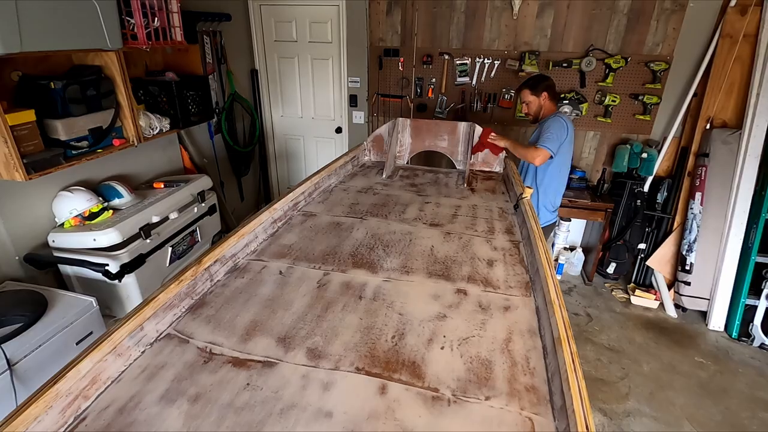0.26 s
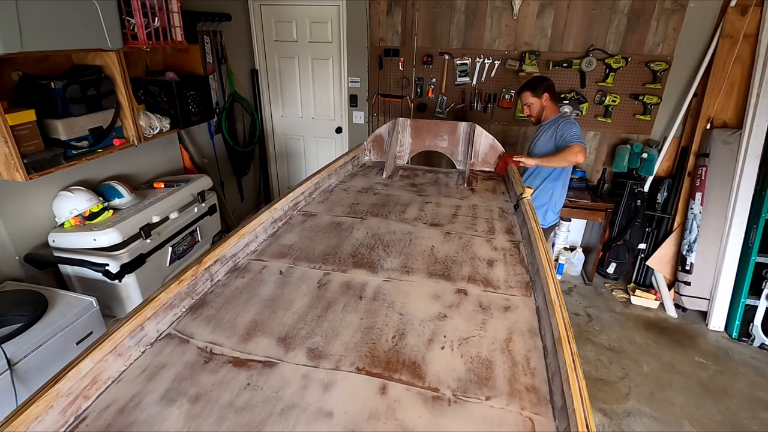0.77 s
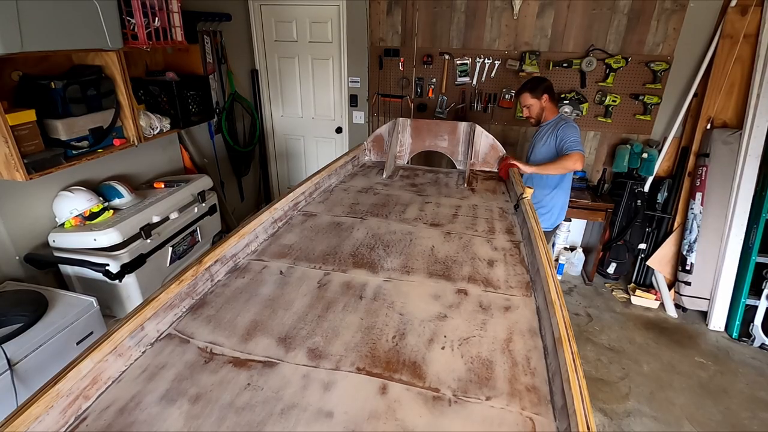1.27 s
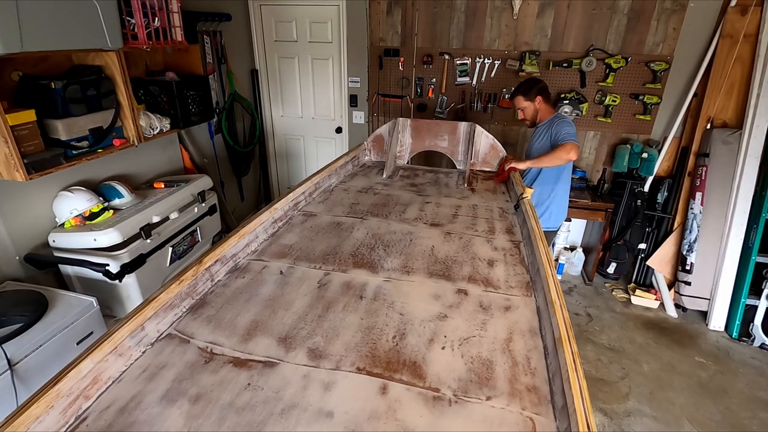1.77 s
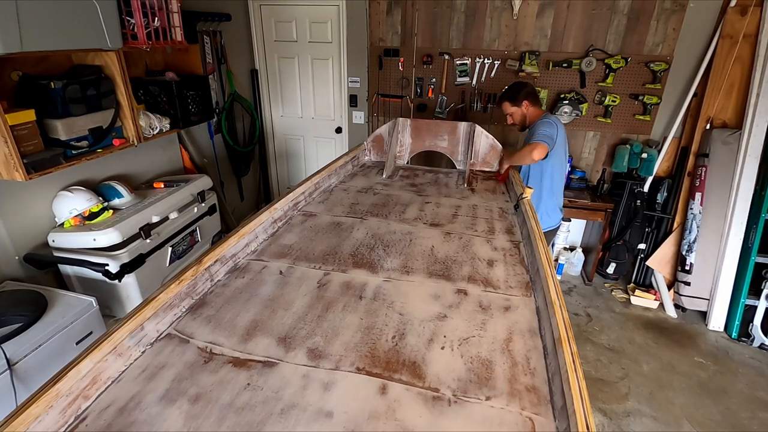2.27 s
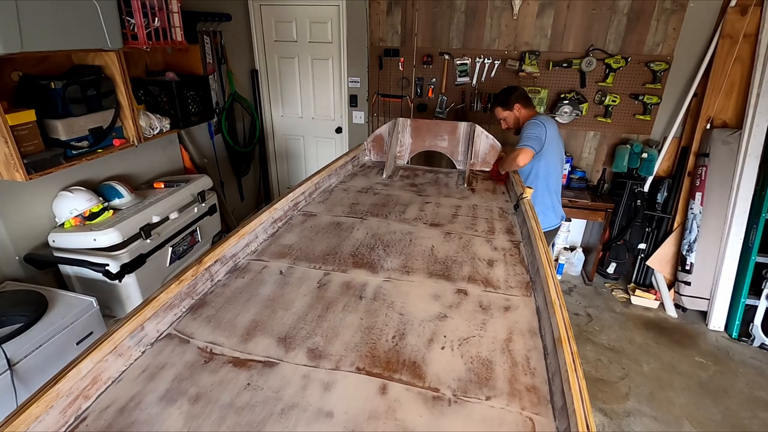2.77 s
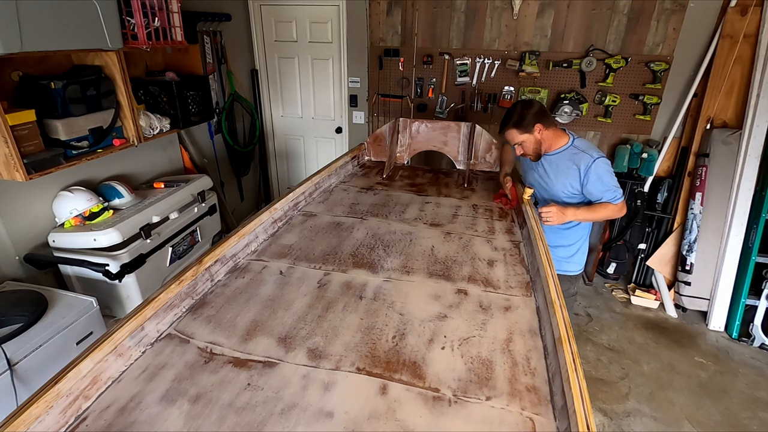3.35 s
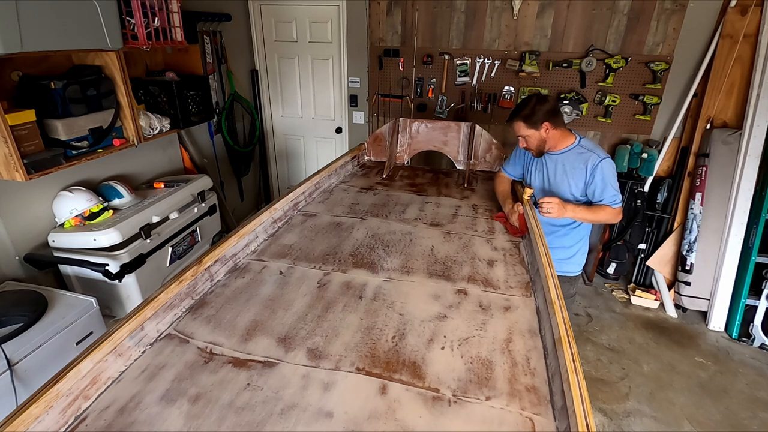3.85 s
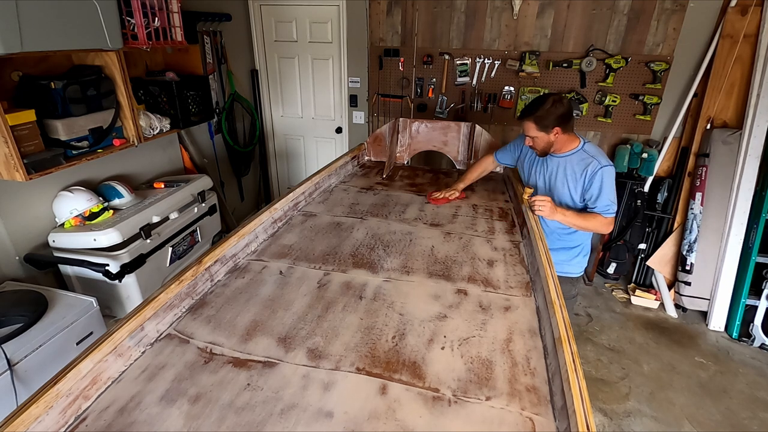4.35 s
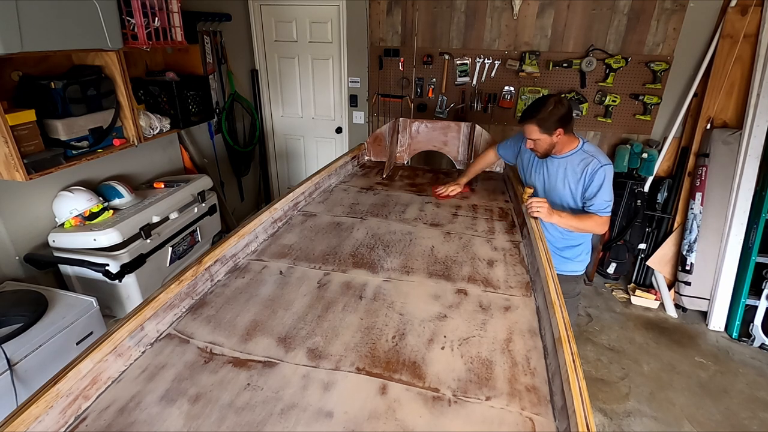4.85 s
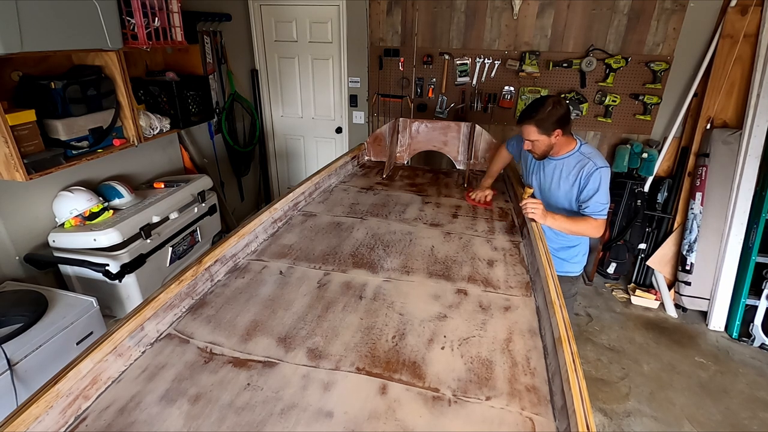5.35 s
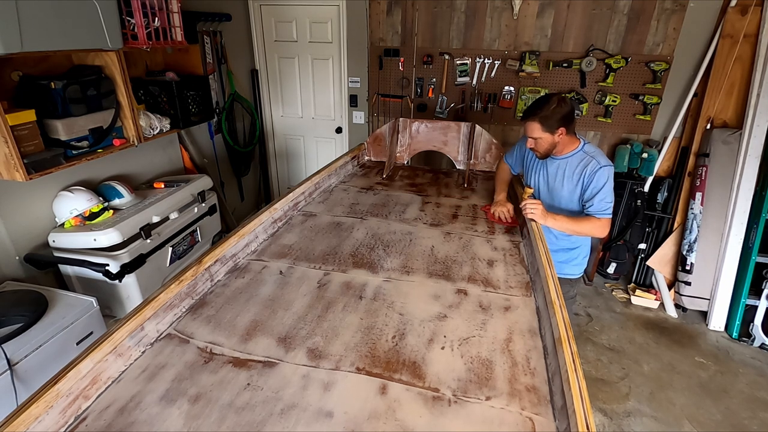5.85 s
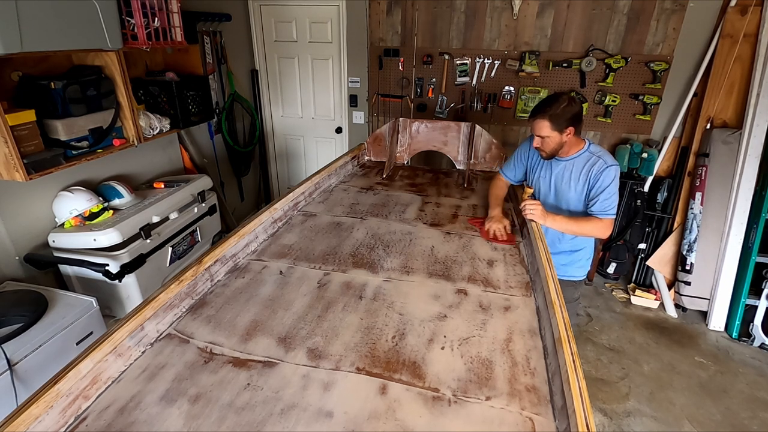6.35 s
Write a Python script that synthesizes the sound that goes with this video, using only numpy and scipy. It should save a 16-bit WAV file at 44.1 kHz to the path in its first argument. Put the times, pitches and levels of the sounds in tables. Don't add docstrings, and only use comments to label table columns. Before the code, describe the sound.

Close dry cloth scrubbing on a wooden hull in a garage, uneven strokes becoming steady circular swishes as a deep motor hum cuts to faint fan throb.

```python
import sys
import numpy as np
from scipy import signal
from scipy.fft import rfft, irfft, next_fast_len
from scipy.io import wavfile
from scipy.ndimage import uniform_filter1d, map_coordinates

SR = 44100
rng = np.random.default_rng(int(sys.argv[2]) if len(sys.argv) > 2 else 0)


def wrap_up_sound(samples):
    columns = np.atleast_2d(samples).T
    tamed = np.clip(columns, -1, 1)
    steps = np.round(tamed * 32767).astype(np.int16)
    wavfile.write(sys.argv[1], SR, steps)


def gain_from_db(level_db):
    decades = np.asarray(level_db, float) / 20
    return 10 ** decades


N = 291942
T = np.arange(N) / SR
CHANGE_S, LAST_CHANGE_S = 3.0531, 6.51
CIRCLES_FROM_S = 3.9


def unit(x):
    return x / np.sqrt(np.mean(x ** 2) + 1e-20)


def along(points, hz):
    f, v = np.transpose(points)
    return np.interp(np.log(hz + 1), np.log(f + 1), v)


def curves(rows):
    s, *cols = np.transpose(rows)
    return [np.interp(T, s, c) for c in cols]


def swells(rows, shape=2):
    return sum(db * np.exp(-np.abs((T - s) / half) ** shape) for s, db, half in rows)


def wobble(rate):
    coarse = T[::64]
    knots = rng.standard_normal(int(N * rate / SR) + 4)
    return np.interp(T, coarse, map_coordinates(knots, [coarse * rate]))


def filtered(x, response):
    m = next_fast_len(N + SR // 2)
    return irfft(rfft(x, m) * response(np.fft.rfftfreq(m, 1 / SR)), m)[:N]


def coloured(x, spectrum):
    return unit(filtered(x, lambda hz: gain_from_db(along(spectrum, hz))))


def resonant(x, modes):
    def body(f):
        total = 0
        for k, (centre, width, db) in enumerate(modes):
            damping = 1j * f * width
            total = total + (-1) ** k * gain_from_db(db) * damping / (centre ** 2 - f ** 2 + damping)
        return total
    return unit(filtered(x, body))


def soft(x):
    return filtered(x, lambda hz: 1 / (1 + (hz / 7000) ** 2))


def slips(spread_db, patchy_db, favoured=None, lift=0, width_hz=600):
    grains = rng.standard_normal(N + 512) * gain_from_db(spread_db * rng.standard_normal(N + 512))
    hz, t, z = signal.stft(grains, SR, nperseg=1024)
    field = uniform_filter1d(rng.standard_normal(z.shape), size=14, axis=0)
    field = uniform_filter1d(field, size=7, axis=1)
    z = z * gain_from_db(patchy_db * unit(field))
    if favoured:
        centre_hz = np.interp(t, *np.transpose(favoured), left=-1e5, right=-1e5)
        z = z * (1 + lift / (1 + ((hz[:, None] - centre_hz) / width_hz) ** 2))
    return signal.istft(z, nperseg=1024)[1][:N]


def fibre_hiss(sweep_db, stop_db):
    # f/Hz, level/dB per Hz
    hiss = [(1500, -17), (3200, -6.5), (5000, -2.5), (7000, -1.5), (9500, -0.5), (10800, -9), (13000, -49)]
    circle_s, top_s = 0.583, 4.07
    t = np.arange(CIRCLES_FROM_S, T[-1], 0.03)
    pocket_hz = 5400 + 550 * np.cos(2 * np.pi * (t - top_s) / circle_s)
    grains = slips(spread_db=2.5, patchy_db=0.8, favoured=list(zip(t, pocket_hz)), lift=0.46, width_hz=1200)
    return gain_from_db(sweep_db - stop_db) * coloured(grains, hiss)


def sheen(stroke_db, sweep_db, stop_db):
    # f/Hz, level/dB per Hz
    treble = [(8000, -17), (10500, -2), (12500, -1.5), (14500, -0.5), (15800, -1.5), (16500, -60)]
    level_db = -3.5 + 0.5 * sweep_db - 1.4 * stop_db
    level_db = level_db + 2.5 * (T > LAST_CHANGE_S)
    on_rail_db = -1.5 - 0.15 * (stroke_db + 55.5)
    level_db = level_db + (T < CIRCLES_FROM_S) * on_rail_db
    return gain_from_db(level_db) * coloured(slips(spread_db=3.0, patchy_db=0.4), treble)


def rail(drag_db, stop_db):
    # f/Hz, width/Hz, level/dB
    strip = [(1378, 700, -1.5), (2050, 980, 3), (2880, 910, 3), (4140, 2500, -3)]
    # middle t/s, gain/dB, half length/s
    catches = [(0.27, 5, .03), (0.42, 2, 0.075), (1.465, 7.5, 0.013), (2.2, 7, .02), (2.3, 5, .03),
               (2.68, 4.5, 0.054), (3.26, 3, .04), (3.62, 3.5, 0.044)]
    level_db = drag_db - 0.41 * stop_db + swells(catches) - 1.5
    return gain_from_db(level_db) * resonant(soft(slips(spread_db=4.5, patchy_db=0.97)), strip)


def panel(stop_db):
    # f/Hz, width/Hz, level/dB
    ply = [(305, 140, -2.5), (540, 126, 1), (912, 324, -0.5), (1072, 253, 1.5), (1540, 275, -5.5)]
    # middle t/s, gain/dB, half length/s, nearest panel tone f/Hz
    presses = [(0.014, 9, 0.064, 890), (0.12, 4.5, 0.05, 418), (0.28, 3.5, 0.037, 800),
               (0.354, 13, 0.066, 564), (0.482, 12.5, 0.057, 540), (0.99, 10, .03, 600),
               (1.187, 14, 0.033, 574), (1.35, -4, 0.062, 700), (1.55, 10.5, 0.038, 523),
               (1.657, 3, .05, 800), (1.797, 4, .05, 765), (2, 6.5, 0.062, 795), (2.13, 4, .04, 564),
               (2.246, 14.5, 0.037, 900), (2.305, 5.5, .04, 800), (2.39, 11, .04, 500),
               (2.62, 7.5, 0.092, 710), (2.75, 7, 0.058, 520), (2.96, 7.5, 0.091, 790),
               (3.283, 3, 0.11, 885), (3.65, 2.5, 0.087, 920), (4.086, 4.5, 0.11, 590),
               (4.61, 6.5, .025, 590), (4.74, 3, 0.019, 590), (5.35, 3, 0.058, 584), (5.984, 1, 0.044, 600),
               (6.269, 9, 0.015, 595)]
    far_db = -7.5 * np.clip((T - CHANGE_S) / 0.5, 0, 1)
    level_db = swells([row[:3] for row in presses]) - 6.5 + far_db - 0.28 * stop_db
    place = [(s, hz) for s, _, _, hz in presses]
    grains = slips(spread_db=3.0, patchy_db=1.0, favoured=place, lift=1.1, width_hz=140)
    return gain_from_db(level_db) * resonant(soft(grains), ply)


def rag():
    # t/s, stroke level/dB, drag into the rail/dB
    effort = [(0.0, -53.5, -2), (0.1, -52.5, -3.5), (0.28, -51.5, -4.5), (0.55, -58.5, -2.5),
              (0.75, -60.5, 0.5), (1.3, -61, -1.5), (1.46, -57.5, -1), (1.8, -56.5, -5.5), (2.1, -55, -4.5),
              (2.3, -53.5, -3.5), (2.62, -53, -3.5), (3.0, -49.5, -3), (3.3, -47.5, -3.5), (3.6, -47, -4.5),
              (3.85, -53, -3), (4.04, -53.5, -4.5), (4.15, -48.5, -6.5), (6.62, -49, -6)]
    # middle t/s, loss/dB, half length/s
    turns = [(0.165, 12, 0.037), (0.835, 10, 0.043), (0.91, 6.5, .045), (1.095, 16, 0.07),
             (1.352, 10, 0.038), (1.61, 14, 0.058), (1.881, 10.5, 0.037), (2.15, 10.5, 0.052),
             (2.479, 12, 0.039), (2.744, 14.5, 0.081), (3.078, 13, .025), (3.407, 9.5, 0.037),
             (3.786, 8.5, 0.035)]
    # middle t/s, gain/dB
    sweeps = [(4.26, -1.5), (4.46, 1.5), (4.72, 1.5), (4.89, 3.5), (5.02, 3), (5.13, 3), (5.26, 2),
              (5.36, 2), (5.59, 3.5), (5.74, 2), (5.97, 1), (6.19, 4), (6.37, 2), (6.6, 3)]
    stroke_db, drag_db = curves(effort)
    stop_db = swells(turns, shape=2.7)
    sweep_db = swells([(s, db, 0.055) for s, db in sweeps])
    cloth = fibre_hiss(sweep_db, stop_db) + sheen(stroke_db, sweep_db, stop_db)
    wood = rail(drag_db, stop_db) + panel(stop_db)
    tremble = gain_from_db(0.38 * wobble(14))
    return tremble * gain_from_db(stroke_db) * (cloth + wood)


def garage(x):
    # f/Hz, t60/s
    decay = [(200, 1), (2000, 0.26), (10000, 0.054)]
    hz, t, z = signal.stft(rng.standard_normal(SR // 2), SR, nperseg=256)
    fading = gain_from_db(-60 * t / along(decay, hz)[:, None])
    tail = signal.istft(z * fading, SR, nperseg=256)[1]
    return signal.fftconvolve(x, tail / np.linalg.norm(tail))[:N]


def machine(hz, orders, zero, unsteady_db, slant):
    total = 0
    for k, db in orders:
        level = gain_from_db(db + 3 + unsteady_db * wobble(5))
        total = total + level * np.sin(2 * np.pi * k * hz * (T - zero) + slant * (k * k - 1))
    return total


def compressor():
    # multiple of the shaft speed, level/dB rms
    overtones = [(2, -54.5), (3, -67.5), (4, -62.5), (8, -70), (16, -72.5)]
    shaft_hz = 29.98
    zero_s = -0.0042 + 0.0034 * np.clip((0.68 - T) / 0.16, 0, 1)
    firm = machine(shaft_hz, [(1, -27)], zero_s, unsteady_db=-0.2, slant=0)
    return firm + machine(shaft_hz, overtones, zero_s, unsteady_db=2.5, slant=0.9)


def car():
    # t/s, f/Hz, level/dB rms
    engine = [
        (0, 109, -51),
        (1.0, 113, -59),
        (1.8, 122.8, -52),
        (2.4, 132.6, -54),
        (3.05, 135.5, -71),
    ]
    hz, db = curves(engine)
    return gain_from_db(db - 5 + 5.9 * wobble(5.96)) * np.sin(2 * np.pi * np.cumsum(hz) / SR)


def rumbles():
    # f/Hz, level/dB per Hz
    early = [(3, -16), (6, 8.5), (9, 14), (14, -35), (42, 2), (56, -3), (66, -16.5), (75, -12), (110, -15),
             (140, -25.5), (300, -50.5)]
    # f/Hz, level/dB per Hz
    late = [(3, -5.5), (10, 6), (22, -11), (37, 1), (46, -24), (59, -13.5), (74, -28), (100, -10),
            (140, -24.5), (300, -43)]
    before = gain_from_db(-40.5) * coloured(rng.standard_normal(N), early)
    return before, gain_from_db(-44.5) * coloured(rng.standard_normal(N), late)


def room_air():
    # f/Hz, level/dB per Hz
    tone = [(90, -3.5), (160, -1.5), (210, 0.5), (300, -1), (520, -4), (750, -9), (1200, -7), (2300, -13),
            (3000, -23), (8000, -27), (15800, -64)]
    return gain_from_db(-56.5 + 0.58 * wobble(4.16)) * coloured(slips(spread_db=0.4, patchy_db=1.1), tone)


def bumps():
    # t/s, peak level/dB, f/Hz, t60/s
    contacts = [(0.28, -51, 306, 0.059), (0.37, -53, 227, 0.072), (0.66, -33, 55, 0.27),
                (0.53, -40, 56, .9), (0.64, -43, 62, 0.18), (1.001, -48, 280, 0.055),
                (1.02, -49, 476, 0.048), (1.17, -53.5, 550, 0.12), (1.198, -53, 325, 0.12),
                (1.4, -49, 430, 0.059), (1.79, -49.5, 184, 0.067), (2.649, -47, 271, 0.11),
                (2.4, -56, 374, 0.066), (3.2, -60, 1450, 0.09), (0.083, -54.5, 184, 0.12),
                (2.67, -42, 106, 0.22), (2.661, -50, 170, 0.14), (.66, -52, 180, 0.125),
                (3.06, -44, 100, 0.27)]
    out, t = np.zeros(N + SR), np.arange(SR) / SR
    rough = gain_from_db(2.7 * wobble(60))
    for s, db, hz, t60 in contacts:
        envelope = gain_from_db(db + 10 - 60 * t / t60) * (1 - np.exp(-t / 0.0054))
        out[round(s * SR):][:SR] += envelope * np.sin(2 * np.pi * hz * t)
    return out[:N] * rough


def door():
    # middle t/s, peak level/dB, f/Hz, half length/s, falling zero t/s
    swings = [
        (0.744, -11, 9.02, 0.086, .712),
        (1.208, -24, 9, 0.13, 1.165),
    ]
    total = 0
    for s, db, hz, half, zero in swings:
        envelope = gain_from_db(db) * np.exp(-np.abs((T - s) / half) ** 2.6 / 2)
        total = total - envelope * np.sin(2 * np.pi * hz * (T - zero))
    return total


def fan():
    # multiple of the shaft speed, level/dB rms
    throb = [(2, -50.5), (3, -58), (4, -68), (5, -51), (6, -59), (7, -63.5), (11.7, -67.5), (12, -66.5),
             (18, -70.5), (24, -76)]
    # multiple of 59.9 Hz, level/dB rms
    mains = [(1, -61.5), (4, -70)]
    blades = machine(17.5, throb, 0, unsteady_db=1.3, slant=0.25)
    return blades + machine(59.9, mains, 0, unsteady_db=2.5, slant=0.29)


def background():
    first = np.clip((CHANGE_S - T) / 0.0014 + 0.5, 0, 1)
    second = np.clip((LAST_CHANGE_S - T) / 0.026 + 0.5, 0, 1)
    early_rumble, late_rumble = rumbles()
    before = compressor() + car() + early_rumble
    after = second * fan() + late_rumble
    return first * before + (1 - first) * after + (0.57 + 0.41 * second) * room_air()


def scene():
    work = rag() + bumps()
    return (work + gain_from_db(-15.0) * garage(work) + door() + background())[None]


def band_limit(x):
    return signal.sosfilt(signal.butter(12, 17050, fs=SR, output="sos"), x)


def record(dry):
    mix = filtered(dry[0], lambda hz: hz < 15830)[None]
    return band_limit(mix)


dry = scene()
out = record(dry)
wrap_up_sound(out)
```